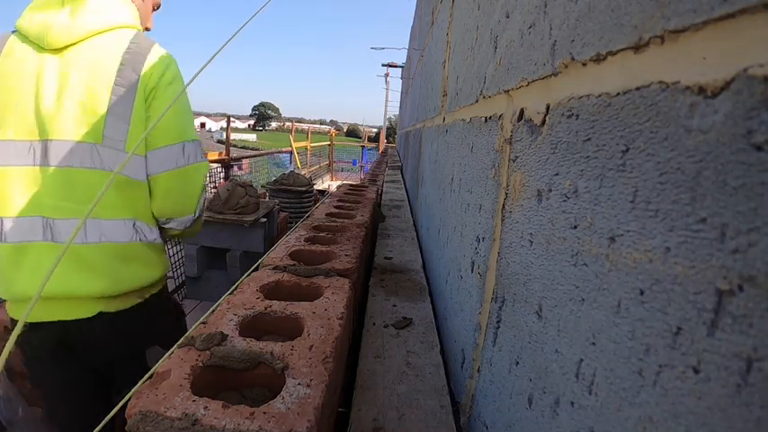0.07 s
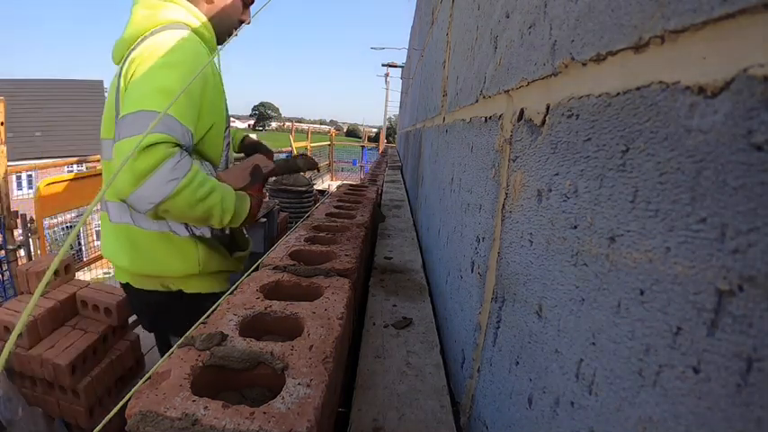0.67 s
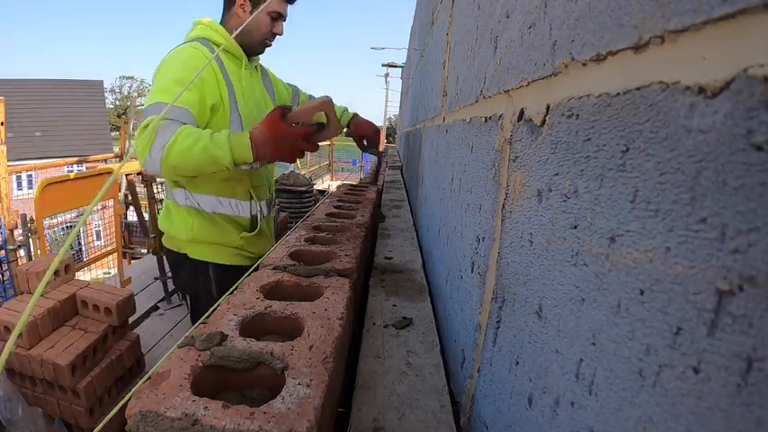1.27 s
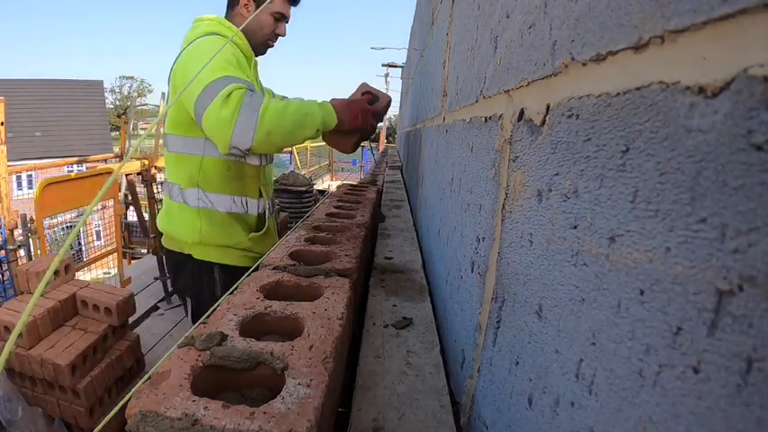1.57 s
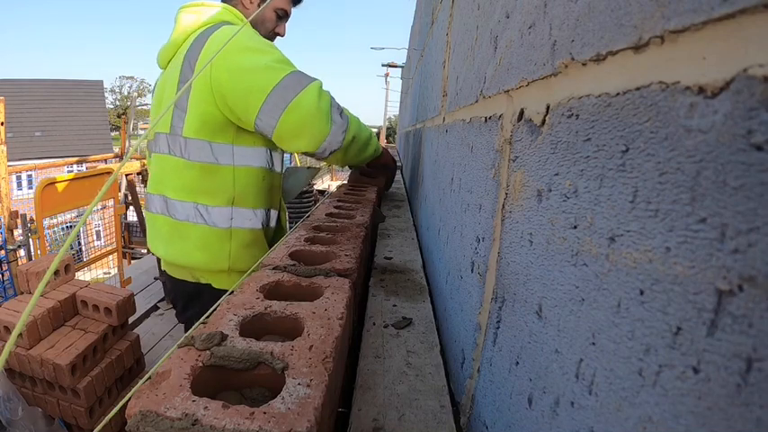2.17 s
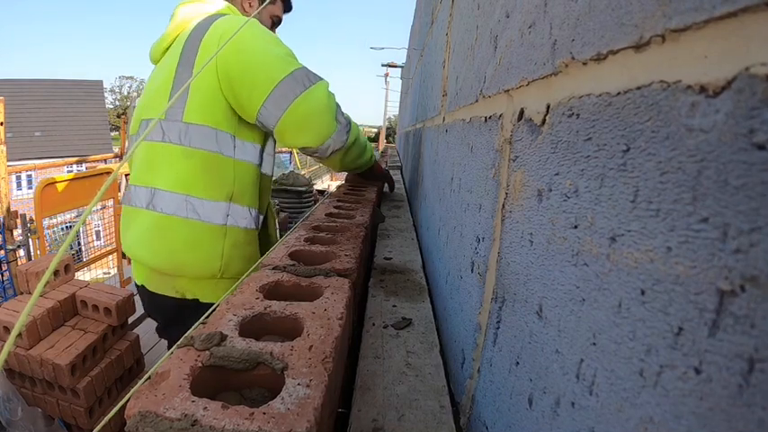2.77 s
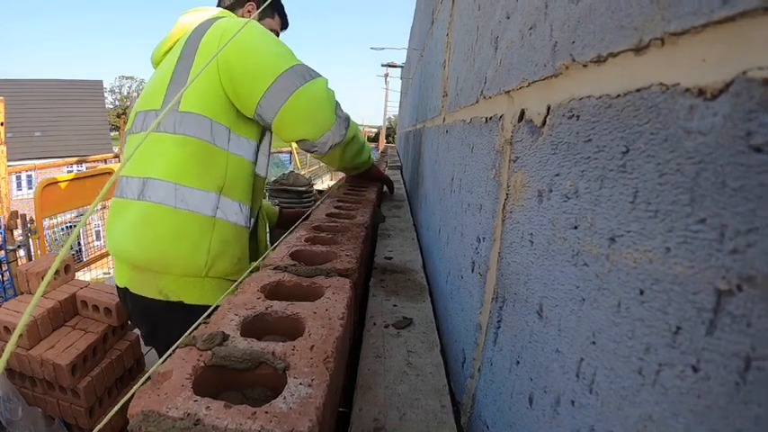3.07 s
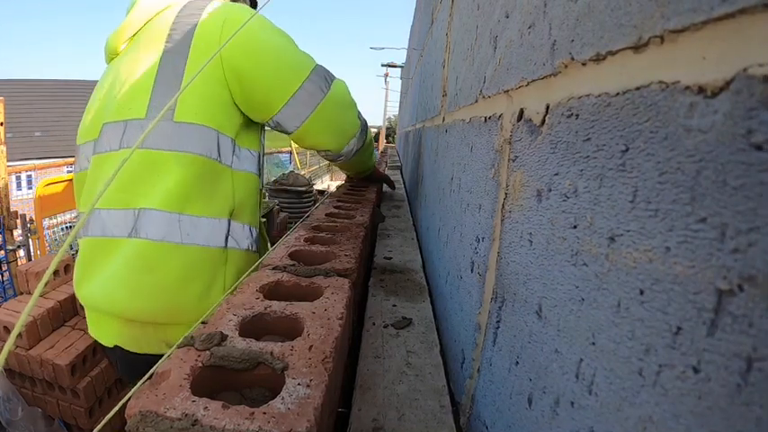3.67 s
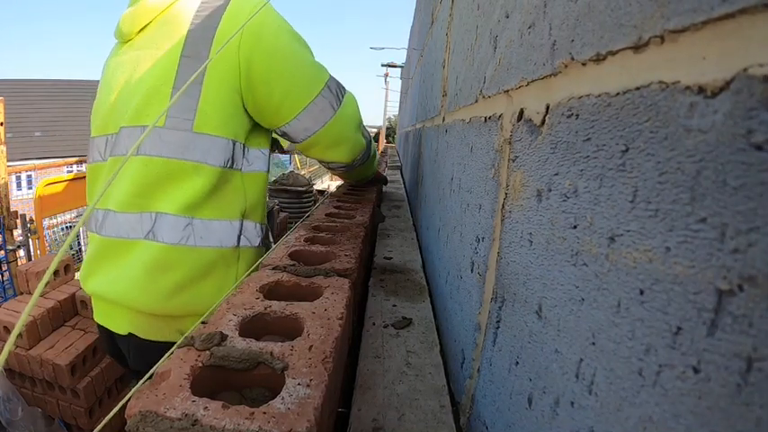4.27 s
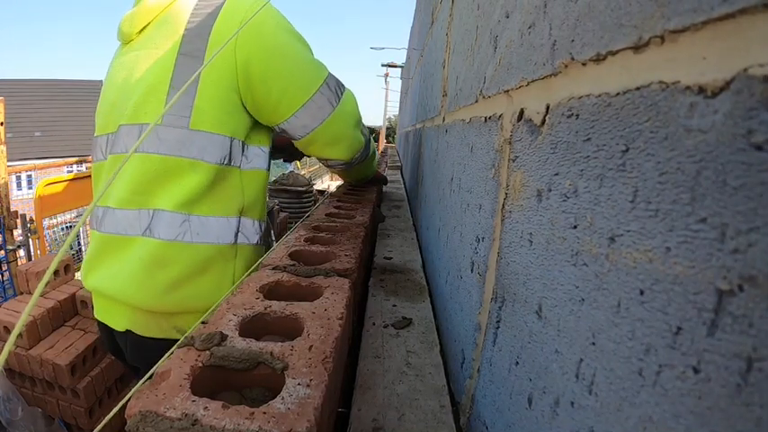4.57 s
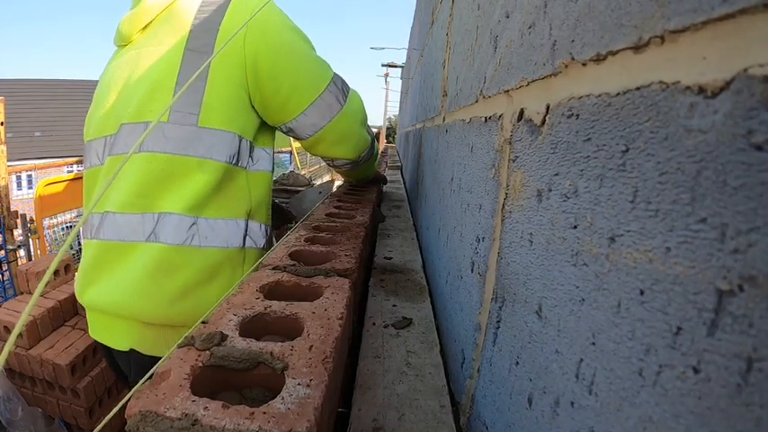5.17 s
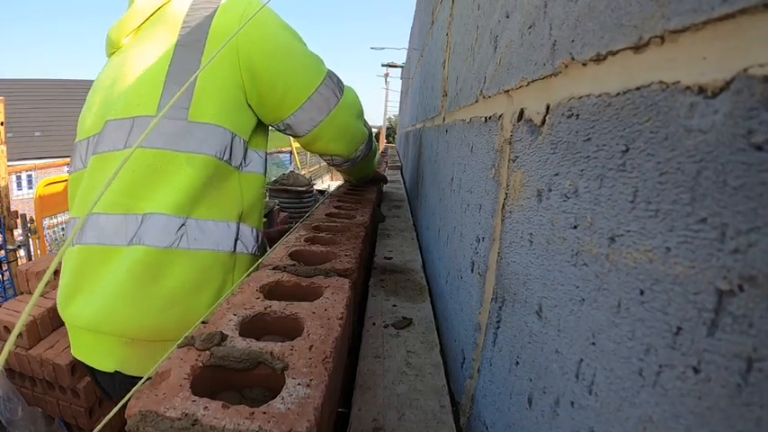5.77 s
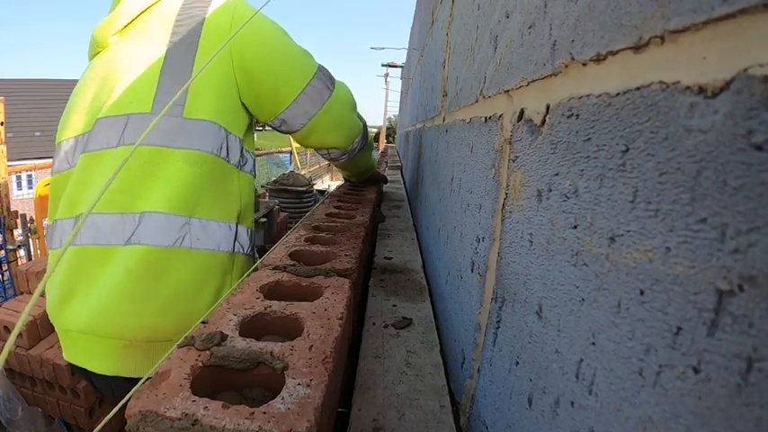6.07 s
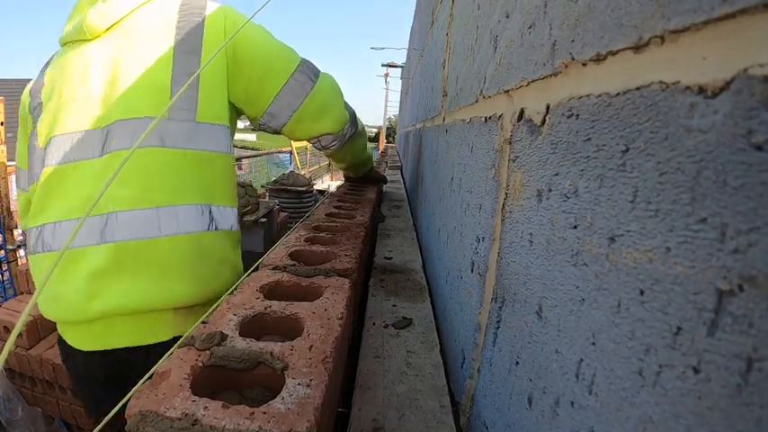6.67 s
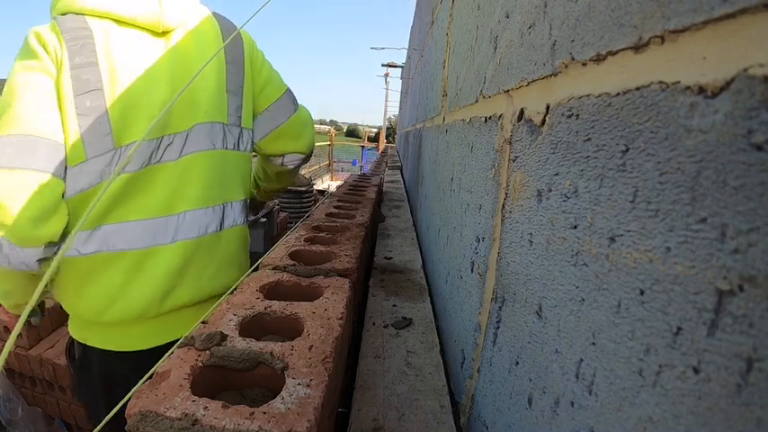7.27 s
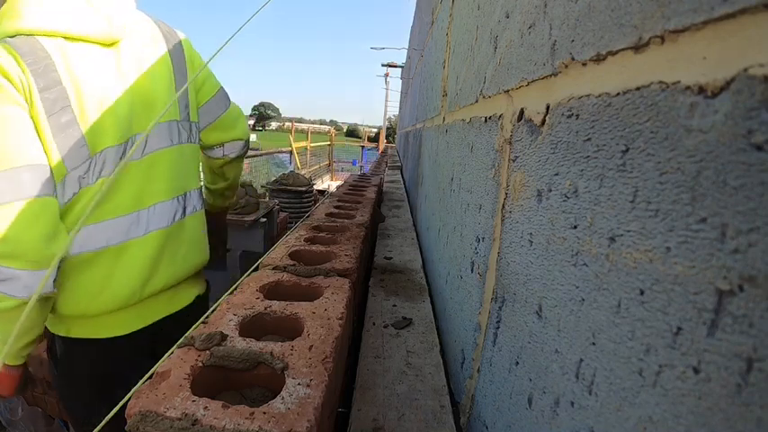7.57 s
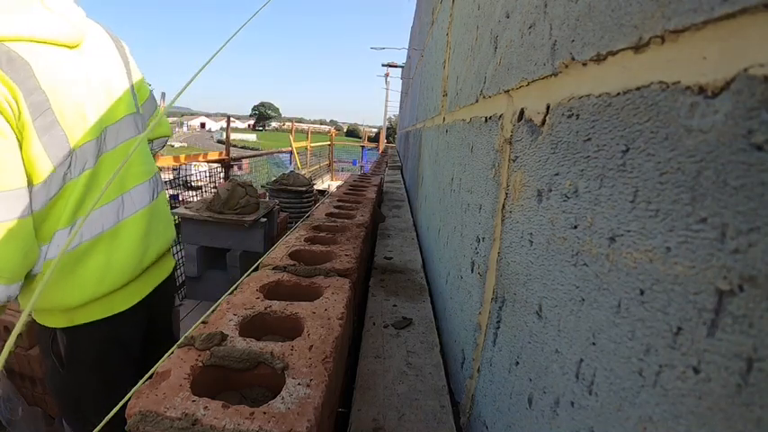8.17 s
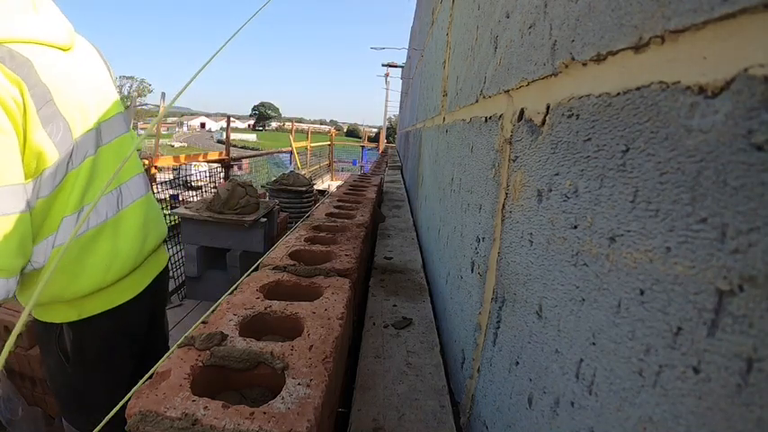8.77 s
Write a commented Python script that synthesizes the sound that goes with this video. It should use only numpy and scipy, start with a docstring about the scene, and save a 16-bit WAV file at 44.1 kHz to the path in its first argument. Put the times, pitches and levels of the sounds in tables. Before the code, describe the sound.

A brick is knocked and ground into wet mortar, then a trowel scrapes and squeaks along the joint over faint site rumble.

```python
"""A distant site rumbles, and close by clothes rustle and a trowel scoops and smears wet mortar.
The microphone rests on the course of wall being laid. A brick knocks, grinds down through the sand
and is tapped home, duller as it beds, while the wall booms under it. The trowel strikes off the
joint, squeaking as the steel sticks and slips, then goes back to scraping mortar."""
import sys
import numpy as np
from scipy import signal
from scipy.fft import rfft, irfft
from scipy.io import wavfile
from scipy.ndimage import uniform_filter1d

SR = 44100
rng = np.random.default_rng(int(sys.argv[2]) if len(sys.argv) > 2 else 0)


def int16_out(signal):
    """Quantize to a 16-bit WAV file."""
    q = np.round(np.clip(np.atleast_2d(signal).T, -1, 1) * 32767)
    wavfile.write(sys.argv[1], SR, q.astype(np.int16))


N = 393372
T = np.arange(N) / SR
BEDDED_S = 3.25  # from here on the brick sits fast in its mortar
GRIND_RISE_S, GRIND_FADE_DB_PER_S = 0.0048, 1102

# brick on brick: (t/s, clack/dB, thud/dB, crumbling time/s)
BLOWS = [(2.285, -48.5, -56, 0.0058), (2.325, -37, -59, 0.0056), (2.695, -23.5, -56, 0.0052),
         (2.718, -22, -43, 0.0064), (2.726, -21.5, -43, 0.0029), (2.796, -30.5, -49, 0.0031),
         (2.856, -28, -36, 0.0049), (2.914, -24, -41, 0.005), (2.932, -20.5, -28.5, 0.0069),
         (2.947, -21.5, -34, 0.00049), (2.958, -24, -49, 0.00078), (2.992, -16, -20, 0.0035),
         (3.053, -37.5, -48, 0.0041), (3.078, -36, -50, 0.003), (3.112, -33, -43, 0.0014),
         (3.137, -42, -48, .008), (3.168, -28, -14.5, 0.0023), (3.172, -17, -24, 0.0032),
         (3.183, -28, -21, 0.0047), (3.2867, -27, -16.5, 0.0052), (3.379, -36, -22.5, 0.0053),
         (5.336, -58.5, -69, .006), (5.972, -40, -31, 0.0039), (6.001, -35, -30, 0.0051),
         (6.021, -38, -43, 0.0019)]
# the brick pushed down through sand: (t/s, length/s, final level/dB, swell/dB, sharp grit/dB)
PUSHES = [(2.733, 0.066, -47.5, 3, -52), (2.804, 0.071, -25, 20, -33), (2.878, 0.015, -20, 3, -28),
          (2.912, 0.056, -24.5, 0.5, -35.5), (2.979, 0.029, -26, 1, -40), (3.03, 0.29, -66, -3.5, -71)]
# the trowel along the joint: (t/s, length/s, final level/dB, swell/dB, sharp grit/dB, brick judder/dB)
JOINT_PASSES = [(3.285, 0.12, -59, -5.5, -63.5, -57.5), (3.393, 0.13, -52, 8.5, -59.5, -41.5),
                (3.566, 0.11, -52, 13.5, -57.5, -36), (5.684, 0.086, -37, 7.5, -47, -34),
                (5.789, 0.13, -36, 5, -44, -40.5), (5.932, 0.084, -31, 11, -44, -27.5)]
# spectra of the brick's body, its gritty edge and loose sand: (f/Hz, level/dB)
BRICK_SPECTRUM = [(100, -28.5), (300, -17), (500, -12.5), (700, -4.5), (950, -1), (1400, -1.5),
                  (1800, -6.5), (2400, -19), (3500, -25.5), (5000, -60), (9000, -75)]
EDGE_SPECTRUM = [(1000, -3.5), (2100, 1.5), (2700, -2.5), (3650, 0), (4250, -13.5), (4800, -14.5),
                 (5600, -25.5), (7000, -30), (9000, -49.5), (14000, -58.5)]
SAND_SPECTRUM = [(1200, -2.5), (2500, -12.5), (3100, -5.5), (4500, -21.5), (5400, -23), (6100, -25.5),
                 (7000, -35.5), (8200, -25.5), (9500, -38), (11000, -51.5), (14000, -40.5)]
# the brick's resonances: (f/Hz, width/Hz, height/dB)
BRICK_RESONANCES = [(596, 40, 4), (790, 60, 1), (908, 70, 5), (1170, 70, 5), (1555, 40, 5), (1761, 45, 6),
                    (2274, 70, 5), (3690, 80, 6)]
# stereo width at the microphone, wide for the brick, narrow for rubbing: (f/Hz, side minus mid/dB)
WIDE_IMAGE = [(100, -51.5), (300, -7.5), (600, -7), (1200, -3), (1800, -19.5), (3000, -5.5), (6000, 3.5),
              (14000, -17)]
NARROW_IMAGE = [(100, -53), (600, -20), (1600, -29.5), (2800, -5.5), (5000, -1), (14000, -4.5)]


def gain_of(db):
    """Decibels to amplitude."""
    return 10 ** (np.asarray(db) / 20)


def unit_rms(x):
    """Scales to rms 1."""
    return x / np.sqrt(np.mean(x ** 2) + 1e-20)


def steadied(x, seconds):
    """Holds the running rms near 1, so that the force of the hand sets the level."""
    power = uniform_filter1d(np.atleast_2d(x ** 2).mean(0), max(int(seconds * SR), 2))
    return x / np.sqrt(abs(power) + 1e-12)


def add(mix, s, sound):
    """Mixes a sound in at s seconds."""
    part = mix[:, max(round(s * SR), 0):][:, :sound.shape[1]]
    part += sound[:, :part.shape[1]]


def wander(per_s):
    """A random drift of rms 1."""
    points = rng.standard_normal(8192)
    return unit_rms(np.interp(T * per_s, np.arange(len(points)), points))


def body(spectrum, modes=(), size=8192):
    """Impulse response of a broad spectrum with resonances on it; it falls steeply past the last point."""
    hz = np.fft.rfftfreq(size, 1 / SR)
    f, db = np.transpose(spectrum)
    db = np.interp(np.log(hz + 1), np.log(f + 1), db) - 18 * np.log2(np.maximum(hz / f[-1], 1))
    for centre, width, height in modes:
        db = db + height / (1 + (2 * (hz - centre) / width) ** 2)
    cepstrum = irfft(np.log(gain_of(db)))
    cepstrum[1:size // 2] *= 2  # folding the cepstrum makes the response causal
    cepstrum[size // 2 + 1:] = 0
    return irfft(np.exp(rfft(cepstrum))) * np.cos(np.linspace(0, np.pi / 2, size)) ** 2


def through(x, response):
    """Passes each row of x through a body."""
    return signal.oaconvolve(x, response[None], axes=1)[:, :x.shape[1]]


def dulled(x, corner_hz):
    """A gentle low-pass."""
    return signal.sosfilt(signal.butter(2, min(corner_hz, SR / 3), fs=SR, output="sos"), x)


def along_wall(response, travel_s):
    """Bending waves spread on the way to the microphone: treble first, 1 kHz after travel_s, bass last."""
    size = 2 * len(response)
    hz = np.fft.rfftfreq(size, 1 / SR)
    turns = 2 * travel_s * np.sqrt(1000 * hz)
    return irfft(rfft(response, size) * np.exp(-2j * np.pi * turns))[:size // 2]


def at_microphone(pair, image):
    """Two unrelated versions of a sound become mid and side; bass stays central."""
    # balance of the microphone's two ports: (f/Hz, left minus right/dB)
    balance = [(200, 0.5), (650, -0.5), (1000, -1), (1600, 1), (2600, 6), (3500, 5), (4500, -5.5),
               (8000, -1.5), (14000, 2)]
    mid, side = pair[:1], through(pair[1:], body(image))
    left = through(mid + side, body([(f, db / 2) for f, db in balance]))
    right = through(mid - side, body([(f, -db / 2) for f, db in balance]))
    return np.vstack([left, right])


def grains(per_s, spread_db, slips_per_s, slip_db):
    """Two rows of tiny cracks, in clumps as a surface catches and slips."""
    size = gain_of(spread_db * np.minimum(rng.exponential(1, N), 4))
    cracks = rng.random(N) < per_s / SR
    return rng.standard_normal((2, N)) * size * cracks * gain_of(slip_db * wander(slips_per_s))


def stroke(start, length, db, rise_s, fade_db_per_s, swell_db=0):
    """Gain of one movement: it sets in, moves by swell_db to its level, and dies away."""
    t = T - start
    to_come, over = np.clip(1 - t / length, 0, 1), np.clip(t - length, 0, 2)
    return np.clip(t / rise_s, 0, 1) * gain_of(db - swell_db * to_come - fade_db_per_s * over)


def blade_drag(fade_db_per_s, rise_s=0.013):
    """How hard the trowel strokes shake the brick."""
    return sum(stroke(s, length, db, rise_s, fade_db_per_s, swell)
               for s, length, _, swell, _, db in JOINT_PASSES)


def brick_push(fade_db_per_s):
    """How hard the brick is driven through the sand."""
    return sum(stroke(s, length, db, GRIND_RISE_S, fade_db_per_s, swell)
               for s, length, db, swell, _ in PUSHES)


def distant_site(rumble_db=-52, hum_hz=106, hum_db=-60):
    """Far off: traffic, a low rumble and the wavering hum of an engine."""
    # spectra of the far traffic and of the rumble: (f/Hz, level/dB)
    traffic_spectrum = [(100, 5.5), (200, 1), (340, -10.5), (450, -6), (660, -7), (780, -0.5), (1200, -1),
                        (1500, -9), (1800, -11), (2300, -24), (3100, -28.5), (4500, -33), (6500, -41),
                        (10000, -53.5), (14000, -56.5)]
    rumble_spectrum = [(8, 1), (30, 4), (55, 6.5), (80, 1.5), (110, 2.5), (145, -25.5), (210, -13.5),
                       (400, -24.5)]
    # peaks and a dip in the traffic: (f/Hz, width/Hz, height/dB)
    traffic_modes = [(940, 39, 4.5), (1320, 92, 10.5), (2584, 240, -11), (2920, 220, 7.5)]
    # the background's level ducks after the loud knocks and slowly recovers: (t/s, level/dB)
    background_levels = [(0, -51.5), (.4, -50.5), (1.3, -52), (2.6, -49.5), (3.8, -60), (4.4, -56),
                         (5.05, -53.5), (6.4, -55), (7.5, -52.5), (8.92, -55)]
    # its stereo width: (f/Hz, side gain/dB)
    side_spectrum = [(60, -12.5), (120, -19), (240, -12), (490, -14.5), (990, -16), (1990, -12),
                     (4000, 0.5)]
    # it narrows to the centre for a while: (t/s, side gain/dB)
    side_levels = [(2.7, 6), (3.3, -4), (3.8, -32.5), (5.1, -32), (5.6, -10.5), (6.8, -0.5), (8.9, 4)]
    noise = rng.standard_normal((3, N))
    traffic = unit_rms(through(noise[:2], body(traffic_spectrum, traffic_modes)))
    background = traffic * gain_of(np.interp(T, *np.transpose(background_levels)) + 0.51 * wander(12))
    rumble = unit_rms(through(noise[2:], body(rumble_spectrum))) * gain_of(rumble_db - 3 * wander(6))
    engine_turns = np.cumsum(hum_hz * (1 + 0.0062 * wander(12))) / SR
    hum = np.sin(2 * np.pi * engine_turns) * gain_of(hum_db + 4 * wander(26))
    side = through(background[1:], body(side_spectrum))
    side *= gain_of(np.interp(T, *np.transpose(side_levels)))
    return background[0] + side * np.array([[1], [-1]]) + rumble + hum


def clothes_rustle():
    """Close by, sleeves and gloves rub, swelling and fading with the speed of each swing."""
    # arm swings: (middle t/s, length/s, level/dB)
    swings = [(0.234, 0.48, -58.5), (0.54, 0.28, -68), (0.813, 0.38, -58.5), (1.23, 0.038, -53),
              (1.257, 0.63, -63.5), (1.73, 0.26, -64), (2.27, 0.81, -65.5), (2.632, 0.32, -61.5),
              (4.946, 0.11, -70), (5.09, .05, -67), (5.34, 0.033, -62), (6.75, 0.088, -59),
              (7.14, 0.22, -59), (7.368, 0.22, -62), (7.957, 1, -68), (8.45, 0.15, -61),
              (8.74, 0.57, -59.5)]
    # rubbing fabric: (f/Hz, level/dB)
    cloth = [(600, -1.5), (1400, 30), (2400, 9.5), (3000, 14), (4000, 8.5), (5200, 6.5), (6300, -4),
             (7500, -9), (10000, -26), (13000, -25)]
    fibres = grains(per_s=7300, spread_db=-2, slips_per_s=58, slip_db=2)
    speed = sum(gain_of(db) / (1 + (2 * (T - s) / length) ** 2) ** 2 for s, length, db in swings)
    return at_microphone(speed * steadied(through(fibres, body(cloth)), 0.11), NARROW_IMAGE)


def grit_ticks(decay_s=0.0066, size=3000):
    """Single crumbs crack or drop."""
    # crumbs of grit: (t/s, level/dB)
    crumbs = [(0.8204, -54), (1.213, -53), (3.497, -60), (3.599, -53), (3.6704, -61), (5.6944, -51),
              (5.7716, -40), (5.8682, -41.5), (7.581, -50), (7.863, -68), (8.063, -64), (8.2683, -58)]
    out, t, sand = np.zeros((2, N)), np.arange(size) / SR, body(SAND_SPECTRUM)
    for s, db in crumbs:
        crack = through(rng.standard_normal((2, size)) * np.exp(-t / decay_s), sand)
        add(out, s, gain_of(db) * crack / crack[:, :size // 16].std())
    return at_microphone(out, NARROW_IMAGE)


def wall_boom(drag_db=5, step_rise_s=0.032, press_rise_s=0.031):
    """Wall and scaffold boom under steps, presses and trowel strokes; a press also rocks the microphone."""
    # the bricklayer's weight shifts on the scaffold: (t/s, length/s, boom/dB)
    steps = [(0.838, 0.067, -46.5), (0.96, 0.23, -43.5), (1.289, 0.054, -44), (1.887, 0.13, -49),
             (2.122, 0.2, -43.5), (2.402, 0.37, -45.5), (3.91, .04, -50.5), (4.03, 0.097, -46),
             (4.75, .05, -46), (6.475, .11, -50.5), (6.803, 0.051, -45.5), (7.16, 0.096, -45.5),
             (7.703, 0.15, -38.5), (7.845, 0.12, -45.5), (8.577, 0.38, -53)]
    # the hand leans on the brick: (t/s, length/s, boom/dB, microphone rocking/dB)
    presses = [(2.681, 0.098, -23.5, -22), (2.833, 0.12, -20.5, -18), (2.915, 0.023, -19, -31),
               (3.012, .15, -22.5, -20.5), (3.234, 0.067, -35, -35)]
    # spectra of the wall and of the microphone rocking on it: (f/Hz, level/dB)
    wall = [(25, -27), (50, -6), (68, 4.5), (100, -2), (135, -19), (200, -27), (300, -52.5)]
    mount = [(8, -26.5), (25, -6), (40, -2.5), (60, -15.5), (120, -37), (300, -73.5)]
    # a dip in the wall's boom: (f/Hz, width/Hz, height/dB)
    wall_dip = [(76.5, 5.3, -2)]
    shake = rng.standard_normal((2, N))
    boom = steadied(through(shake[:1], body(wall, wall_dip)), 0.044)
    rock = steadied(through(shake[1:], body(mount)), 0.08)
    force = sum(stroke(s, length, db, step_rise_s, fade_db_per_s=152.5) for s, length, db in steps)
    force += sum(stroke(s, length, db, press_rise_s, fade_db_per_s=111) for s, length, db, _ in presses)
    force += gain_of(drag_db) * blade_drag(fade_db_per_s=99)
    tilt = sum(stroke(s, length, db, press_rise_s, fade_db_per_s=191.5) for s, length, _, db in presses)
    return dulled(force * boom + tilt * rock, corner_hz=330)


def trowel_smears(rise_s=0.0045, fade_db_per_s=169):
    """Wet mortar slides under the blade with a fine sandy hiss."""
    # smearing strokes: (t/s, length/s, final level/dB, swell/dB)
    smears = [(1.851, 0.088, -49, 11), (2, 0.061, -54, 12), (8.25, 0.23, -63.5, -7)]
    # sliding wet mortar: (f/Hz, level/dB)
    paste = [(700, -17), (1100, 25), (1600, -1), (2500, -9), (3200, -4), (5200, -1), (6500, -9),
             (8000, -15.5), (10000, -22.5), (13500, -29)]
    sand = grains(per_s=7000, spread_db=2.5, slips_per_s=150, slip_db=1)
    force = sum(stroke(s, length, db, rise_s, fade_db_per_s, swell) for s, length, db, swell in smears)
    return at_microphone(force * steadied(through(sand, body(paste)), 0.071), NARROW_IMAGE)


def trowel_scoops(rise_s=0.004):
    """Sand runs over the free blade, which rings faintly."""
    # scoops of mortar: (t/s, length/s, final level/dB, swell/dB, fade/dB per s)
    scoops = [(0.325, 0.099, -60.5, 5, 86), (7.576, 0.07, -33.5, 13.5, 211), (8.614, 0.061, -36, 17.5, 562)]
    # the steel blade: (f/Hz, level/dB), and its peaks and dips: (f/Hz, width/Hz, height/dB)
    blade = [(200, -27), (400, -18), (580, -10), (720, -16.5), (1100, -5.5), (1700, 3), (1950, -11),
             (2900, -10.5), (3400, -18.5), (5000, -21), (6300, -25.5), (7200, -34.5), (9500, -43.5),
             (12500, -47), (14000, -43)]
    blade_modes = [(1284, 34, 13), (1620, 76, 2.5), (1880, 36, -4), (2250, 130, 13.5), (2470, 280, -20.5),
                   (2950, 64, 12.5), (3790, 130, 11.5), (4300, 180, 3.5), (6040, 460, 8)]
    sand = grains(per_s=6500, spread_db=-1, slips_per_s=220, slip_db=2.5)
    force = sum(stroke(s, length, db, rise_s, fade, swell) for s, length, db, swell, fade in scoops)
    return at_microphone(force * steadied(through(sand, body(blade, blade_modes)), 0.034), NARROW_IMAGE)


def striking_off(rise_s=0.019, fade_db_per_s=505, grit_fade_db_per_s=270.5):
    """The blade shaves wet mortar from the face of the joint."""
    # shaved mortar: (f/Hz, level/dB)
    mortar = [(80, -32.5), (140, -6.5), (210, 5.5), (310, -2), (530, -4), (780, -3), (1200, 6),
              (1600, -13.5), (2200, -18.5), (3500, -27.5), (6000, -58.5)]
    # resonances of the blade on the joint: (f/Hz, width/Hz, height/dB)
    joint_modes = [(774, 58, 11.8), (1100, 34, 1.9), (1280, 60, 4.1), (1544, 100, 10.4), (1786, 120, 13.5),
                   (3180, 45, 4.2), (3900, 90, 7.9), (4580, 340, 11), (6250, 83, 6)]
    crush = grains(per_s=2800, spread_db=3, slips_per_s=190, slip_db=0.5)
    force = sum(stroke(s, length, db, rise_s, fade_db_per_s, swell)
                for s, length, db, swell, _, _ in JOINT_PASSES)
    grit_force = sum(stroke(s, length, db, rise_s, grit_fade_db_per_s, swell)
                     for s, length, _, swell, db, _ in JOINT_PASSES)
    scrape = force * steadied(through(crush, body(mortar, joint_modes)), 0.053)
    grit = grit_force * steadied(through(crush, body(SAND_SPECTRUM, joint_modes)), 0.02)
    return at_microphone(scrape + grit, NARROW_IMAGE)


def squeaks(jitter=0.0148, flutter_db=1, rise_s=0.0044, fade_db_per_s=789):
    """Brick or blade sticks and slips in a short, unsteady, gliding tone."""
    # stick-slip glides: (t/s, length/s, first f/Hz, last f/Hz, final level/dB, swell/dB)
    glides = [(2.824, 0.054, 745, 1010, -21.5, 15), (3.298, 0.065, 1360, 1405, -56, 3),
              (3.41, 0.11, 1375, 1367, -58, -3), (5.693, .018, 1370, 1384, -38, 7),
              (5.738, 0.037, 1378, 1320, -31, 6), (5.811, 0.057, 1410, 1325, -39.5, -3.5),
              (5.991, 0.018, 2877, 2950, -40.5, 11)]
    out, unsteady = np.zeros(N), 1 + jitter * wander(380)
    for s, length, first_hz, last_hz, db, swell in glides:
        hz = np.interp(T, [s, s + length], [first_hz, last_hz]) * unsteady
        tone = np.sqrt(2) * np.sin(2 * np.pi * np.cumsum(hz) / SR)
        out += stroke(s, length, db, rise_s, fade_db_per_s, swell) * tone
    return out * gain_of(flutter_db * wander(210))


def brick_judder(push_db=-4):
    """Pushing the brick, or dragging the blade along it, shakes it on its soft bed."""
    # the brick on its mortar bed: (f/Hz, level/dB)
    bed = [(70, -31), (110, 9.5), (145, 5), (175, -3), (210, 4), (270, -26.5), (400, -21.5)]
    shake = steadied(through(rng.standard_normal((1, N)), body(bed)), 0.017)
    force = blade_drag(fade_db_per_s=212.5) + gain_of(push_db) * brick_push(fade_db_per_s=600)
    return dulled(force * shake, corner_hz=500)


def brick_grind(coarse_db=3):
    """Sand crushed between two bricks rings them; now and then a coarse grain cracks at the edge."""
    crush = grains(per_s=2600, spread_db=5.5, slips_per_s=660, slip_db=1.5)
    cracks = gain_of(coarse_db) * grains(per_s=200, spread_db=0, slips_per_s=120, slip_db=1.5)
    grit_force = sum(stroke(s, length, db, GRIND_RISE_S, GRIND_FADE_DB_PER_S, swell)
                     for s, length, _, swell, db in PUSHES)
    grind = steadied(through(crush, body(BRICK_SPECTRUM, BRICK_RESONANCES)), 0.0096)
    grit = steadied(through(crush + cracks, body(EDGE_SPECTRUM, BRICK_RESONANCES)), 0.026)
    return at_microphone(brick_push(GRIND_FADE_DB_PER_S) * grind + grit_force * grit, WIDE_IMAGE)


def brick_ring(ring_hz=597, ring_db=-16, t60_s=0.17, size=12000):
    """The loose brick rings briefly after each blow; once it is bedded the mortar damps it."""
    out, t = np.zeros((2, N)), np.arange(size) / SR
    ring = np.sin(2 * np.pi * ring_hz * t) * gain_of(-60 * t / t60_s)
    for s, _, thud_db, _ in BLOWS:
        if s < BEDDED_S:
            add(out, s, gain_of(thud_db + ring_db) * np.array([ring, ring]))
    return out


def brick_knocks(edge_db=-19, crumble=0.42, travel_s=0.002733, size=7000):
    """Each blow is a contact and a brief crumble: the brick clacks, the wall thuds, the edge spits grit."""
    # the struck wall: (f/Hz, level/dB)
    thud_spectrum = [(30, 10.5), (90, 9), (170, 4), (340, -0.5), (480, -18), (800, -3.5), (2000, -87)]
    loose_hz, bedded_hz, settling_s = 3550, 800, 0.53  # the contact dulls as the brick settles
    out, t = np.zeros((2, N)), np.arange(size) / SR
    brick = along_wall(body(BRICK_SPECTRUM, BRICK_RESONANCES), travel_s)
    wall = along_wall(body(thud_spectrum), travel_s)
    edge = along_wall(body(EDGE_SPECTRUM), travel_s)
    blow = np.array([t == 0, t < 0], float)  # an impulse in the mid, none in the side
    strength = np.sqrt(0.015 * SR)  # the energy of 15 ms at rms 1
    for s, clack_db, thud_db, crumble_s in BLOWS:
        crumbling = np.exp(-t / max(crumble_s, 0.001)) * (1 - np.exp(-t / 0.0018))
        crush = rng.standard_normal((2, size)) * crumbling
        hardness_hz = np.interp(s, [BEDDED_S - settling_s, BEDDED_S], [loose_hz, bedded_hz])
        contact = dulled(blow + crumble * crush, hardness_hz)
        parts = (contact, brick, clack_db), (blow, wall, thud_db), (crush, edge, clack_db + edge_db)
        for drive, response, db in parts:
            sound = through(drive, response)
            add(out, s - travel_s, gain_of(db) * strength * sound / np.linalg.norm(sound[0]))
    return at_microphone(out, WIDE_IMAGE)


def scene():
    """Brick and trowel close to the microphone, the site far behind."""
    brick = brick_knocks() + brick_ring() + brick_grind() + wall_boom()
    trowel = striking_off() + brick_judder() + trowel_scoops() + trowel_smears()
    return brick + trowel + squeaks() + grit_ticks() + clothes_rustle() + distant_site()


def record(dry):
    """The recorder's band limit, at 14 kHz."""
    low_pass = signal.firwin(511, 14000, window=("kaiser", 9), fs=SR)
    return signal.oaconvolve(dry, low_pass[None], "same")


dry = scene()
out = record(dry)
int16_out(out)
```